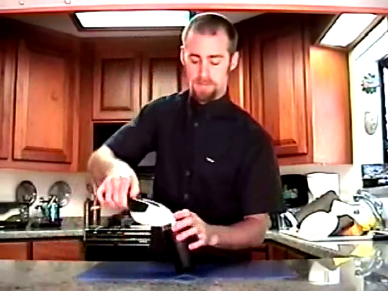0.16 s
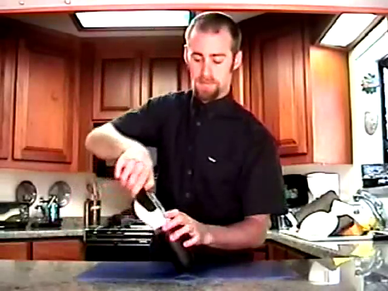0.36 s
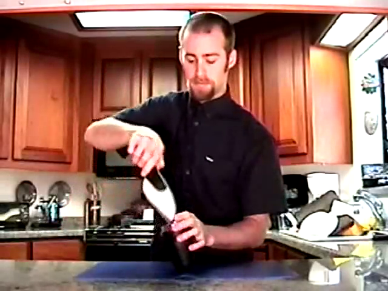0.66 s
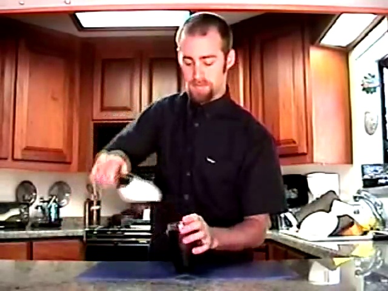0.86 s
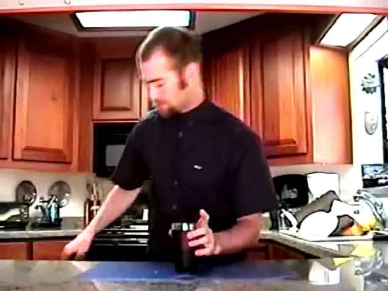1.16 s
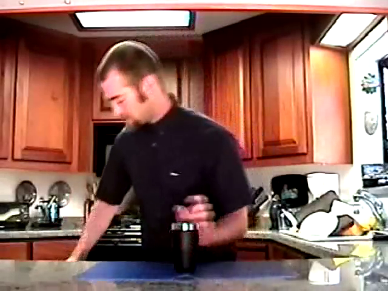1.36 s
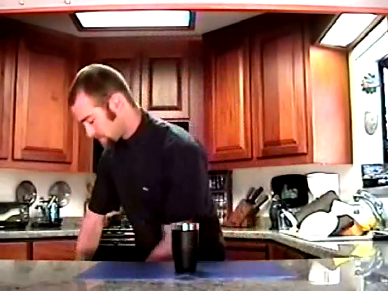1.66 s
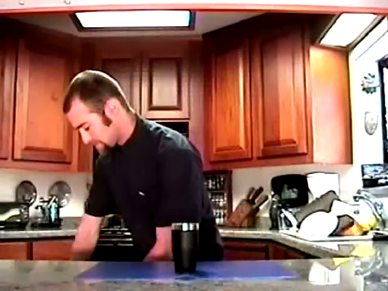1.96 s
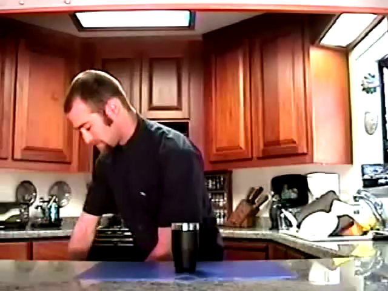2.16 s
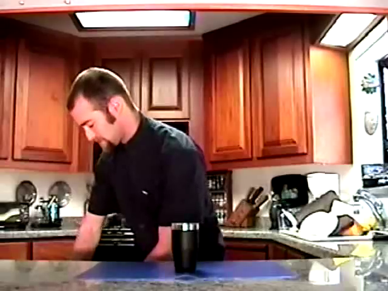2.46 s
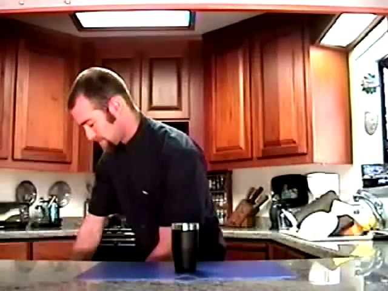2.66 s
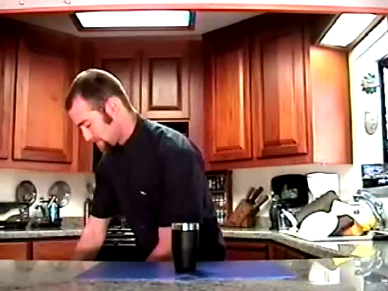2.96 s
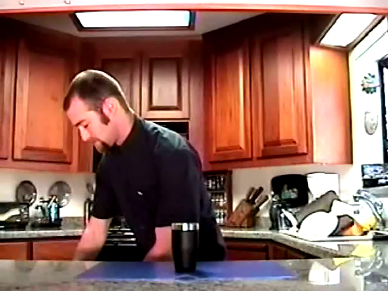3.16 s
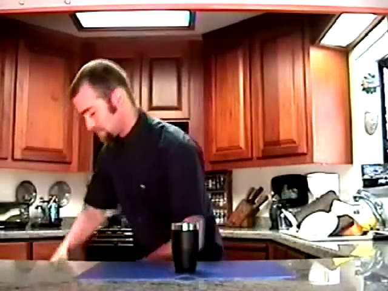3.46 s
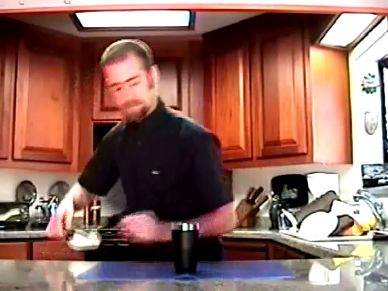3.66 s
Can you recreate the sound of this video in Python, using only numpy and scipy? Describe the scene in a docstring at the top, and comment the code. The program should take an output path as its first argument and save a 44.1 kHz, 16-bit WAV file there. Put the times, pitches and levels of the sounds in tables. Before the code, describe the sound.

Ice cubes clatter into a steel cocktail shaker with a brief metallic ring, after a metal scoop knocks on the rim. The scoop then crunches through a bin of ice and is shaken twice, in an echoing kitchen.

```python
"""A metal scoop knocks on a steel cocktail shaker, and ice cubes slide off and clatter in, ringing the steel.
Then the scoop digs through a bin of ice and is shaken twice, all in an echoing kitchen with a faint hum.
Each hit is a click that becomes a puff of noise and sets tones ringing. A fast volume control flattens
the loud moments. Levels in dB are relative. A ring time is how long a tone takes to fade by 60 dB;
a decay is how long a burst takes to fall to about a third."""
import sys
import numpy as np
from scipy import signal
from scipy.fft import rfft, irfft
from scipy.io import wavfile

SR = 44100
rng = np.random.default_rng(int(sys.argv[2]) if len(sys.argv) > 2 else 0)


def waveform_to_disk(signal):
    """Save audio, clipped to [-1, 1], as 16-bit WAV at the path in sys.argv[1]."""
    frames = np.transpose(np.atleast_2d(signal))
    scaled = np.clip(frames, -1, 1) * 32767
    samples = np.round(scaled).astype(np.int16)
    wavfile.write(sys.argv[1], SR, samples)


N = 167580
TIME = np.arange(N) / SR


def from_db(db):
    """Turn decibels into a number to multiply a sound by."""
    return 10 ** (np.asarray(db) / 20)


def in_time(rows):
    """Join rows that start with a time by straight lines: one curve for each further column."""
    times, *columns = np.transpose(rows)
    return [np.interp(TIME, times, column) for column in columns]


def during(rows):
    """On between the first row's time and the last row's, off elsewhere."""
    return (TIME > rows[0][0]) & (TIME < rows[-1][0])


def at_hz(points, hz):
    """Read between rows of frequency and value, giving every octave equal room."""
    frequencies, values = np.transpose(points)
    return np.interp(np.log(hz + 1e-3), np.log(frequencies), values)


def colour(sound, spectrum, size=4096):
    """Shape the bass and treble of a sound; white noise keeps its overall power."""
    gains = from_db(at_hz(spectrum, np.arange(size // 2 + 1) * SR / size))
    # Build a minimum-phase filter, so that nothing sounds ahead of a hit.
    cepstrum = irfft(np.log(gains))
    cepstrum[1:size // 2] *= 2
    cepstrum[size // 2 + 1:] = 0
    response = irfft(np.exp(rfft(cepstrum)))
    return signal.fftconvolve(sound, response / np.linalg.norm(response))[:N]


def hum():
    """The steady background: faint noise, strongest in the low notes."""
    # Each row: frequency in Hz, level in dB.
    spectrum = [(25, -21), (70, -22), (115, -22.5), (165, -6), (260, -7), (420, -9), (900, -14),
                (2200, -25), (14000, -34)]
    return from_db(-53) * colour(rng.standard_normal(N), spectrum)


def contacts(per_s, spread_db):
    """Pieces of ice touch at random moments: clicks of uneven size, with an average power of 1."""
    sizes = from_db(spread_db * np.minimum(rng.exponential(1, N), 4)) * rng.choice([-1, 1], N)
    clicks = sizes * (rng.random(N) < per_s / SR)
    return clicks / np.std(clicks)


def bursts(jolts):
    """Each jolt starts a shower of tiny clicks that dies away."""
    power = sum(from_db(db) ** 2 * (TIME >= start) * np.exp(-2 * np.abs(TIME - start) / decay_s)
                for start, db, decay_s in jolts)
    return np.sqrt(power) * contacts(per_s=4000, spread_db=1)


def blows(starts, db, scatter_db=2):
    """One click for each hit, by chance a little harder or softer."""
    sizes = from_db(db + scatter_db * rng.standard_normal(len(starts)))
    clicks = np.zeros(N)
    clicks[(np.asarray(starts) * SR).astype(int)] = sizes * rng.choice([-1, 1], len(starts))
    return clicks


def puffs(clicks, decay_s):
    """Every click becomes a short puff of noise with the same energy."""
    fade = np.exp(-2 / (decay_s * SR))
    power = signal.lfilter([1 - fade], [1, -fade], clicks ** 2 + 1e-18)
    return np.sqrt(power) * rng.standard_normal(N)


def ring(clicks, hz, db, ring_s, blur_hz=0, rise=0):
    """Clicks set a tone ringing. Rubbing ice blurs its pitch; a lighter load raises it by a fraction."""
    pole = np.exp((-np.log(1000) / ring_s + 2j * np.pi * hz) / SR)
    tone = signal.lfilter([1], [1, -pole], clicks + 1e-18)
    jitter = rng.standard_normal(N) * np.sqrt(2 * np.pi * blur_hz / SR)
    phase_drift = np.cumsum(jitter + 2 * np.pi * hz * rise / SR)
    return from_db(db) * np.real(tone * np.exp(1j * phase_drift))


def kitchen(sound):
    """The room's echoes: a wash that builds up quickly and lasts longest in the middle pitches."""
    # Each row: frequency in Hz, ring time of the room in seconds.
    ring_times = [(150, 0.33), (700, 0.71), (3000, 0.64), (8000, 0.49), (14000, 0.28)]
    centres, seconds = np.transpose(ring_times)
    t, hz = TIME[:SR], np.arange(SR // 2 + 1)
    noise_spectrum = rfft(rng.standard_normal(SR))
    tail = np.zeros(SR)
    for weights, ring_s in zip(np.eye(len(centres)), seconds):
        band = irfft(noise_spectrum * at_hz(list(zip(centres, weights)), hz), SR)
        tail += band * np.exp(-np.log(1000) * t / ring_s)
    build_up_s = 0.0009
    tail *= 1 - np.exp(-t / build_up_s)
    return signal.fftconvolve(sound, tail / np.linalg.norm(tail))[:N]


def scoop():
    """The full scoop knocks on the rim and rings, while chips tick and cubes slide along it."""
    # Three kinds of jolt. Each row: start in seconds, level in dB, decay in seconds.
    chips = [(0.1196, -42.5, 0.0045), (0.304, -23.5, 0.0025), (0.437, -34, 0.0081), (3.062, -33, 0.0055)]
    slides = [(0.1661, -38.5, 0.0036), (0.4659, -32, 0.0062), (0.5178, -28, 0.011), (0.5514, -30.5, 0.015)]
    knocks = [(0.2368, -20, 0.012), (0.257, -23.5, 0.019), (0.2857, -21.5, 0.01), (0.304, -27.5, 0.011)]
    # The noise of the full scoop, and of the chips. Each row: frequency in Hz, level in dB.
    scoop_spectrum = [(30, -7), (120, -13.5), (320, -4.5), (600, 1), (1000, -8), (1650, 0.5), (2400, 0),
                      (4000, -5), (6000, -13.5), (10000, -15.5), (14000, -29)]
    chip_spectrum = [(500, -8), (3000, 8), (9000, 1), (14000, -4)]
    # The scoop's own tones. Each row: pitch in Hz, level in dB, ring time in seconds.
    tones = [(703, -14.5, 0.14), (755, -19.5, 0.11), (1314, -27, 0.068), (1637, -18.5, 0.08),
             (1715, -19, 0.12)]
    starts, knock_db, _ = np.transpose(knocks)
    sound = colour(bursts(knocks + slides), scoop_spectrum) + colour(bursts(chips), chip_spectrum)
    sound += from_db(10.5) * sum(ring(blows(starts, knock_db), *tone) for tone in tones)
    return from_db(-3.5) * (sound + kitchen(sound))


def shaker():
    """Cubes drop in and tumble. The first ring the bare steel; the growing heap dulls and roughens it."""
    # Cubes strike the wall. Each row: start in seconds, strength in dB, extra wall ring in dB,
    # that ring's lean towards the treble in dB per octave, extra clink in dB.
    drops = [(0.5768, -20, -6, 0, 18), (0.5962, -19, 20, 3, -20), (0.634, -10, 12.5, 0.5, -19),
             (0.6539, 4.5, -3, 2.5, -9), (0.672, 2.5, 5, 0.5, -8), (0.694, -3, 8, -5, 2),
             (0.722, -4.5, 4, -3, 3), (0.756, -3, -5, -11.5, 0), (0.7923, -6.5, -1, 6.5, -3),
             (0.908, -8, -20, -8, -10)]
    # Cubes tumble over each other. Each row: time in seconds, level in dB.
    tumble_curve = [(0.58, -10), (0.66, -6), (0.74, 2.5), (0.84, -5.5), (0.91, -18), (0.97, -24.5),
                    (1.08, -43)]
    # The noise of a cube's hit. Each row: frequency in Hz, level in dB.
    crack_spectrum = [(30, -1), (100, -8), (450, -1), (650, 4), (1000, -1.5), (3000, 7), (7000, -1),
                      (14000, -8)]
    # Steel wall, bright clink and hollow cup. Each row: pitch in Hz, level in dB, ring time in seconds.
    wall_tones = [(2613, -19.5, 0.07), (2665, -19, 0.15), (4740, -30, 0.026), (4790, -21.5, 0.13),
                  (7590, -30.5, 0.051), (8180, -23.5, 0.052), (8290, -21.5, 0.19), (11200, -28.5, 0.031),
                  (12200, -31, 0.049)]
    clink_tones = [(1796, -40, 0.075), (4300, -22, 0.049), (4550, -29, 0.028), (5950, -26.5, 0.051),
                   (6250, -31, 0.04), (9460, -26.5, 0.02), (10730, -32, 0.038)]
    hollow_tones = [(656, -42.5, .1), (778, -48.5, 0.36)]
    # Cubes hit the bottom and thud through to the counter. Each row: start in seconds, level in dB.
    bottom_hits = [(0.576, 2), (0.637, 5), (0.755, 7)]
    starts, drop_db, wall_db, tilt_db, clink_db = np.transpose(drops)
    tumble_db, = in_time(tumble_curve)
    tumble = contacts(per_s=400, spread_db=1.5) * from_db(tumble_db - 25) * during(tumble_curve)

    def strikes(drop_extra_db, tumble_extra_db):
        """The clicks that reach one tone, each with a random strength."""
        small_hits = tumble * from_db(tumble_extra_db) * rng.standard_normal(N)
        return small_hits + blows(starts, drop_db + drop_extra_db)

    hits = tumble + blows(starts, drop_db - 1.5)
    sound = from_db(1) * colour(puffs(hits, decay_s=0.0038), crack_spectrum)
    fill_s, pivot_hz, damping_db_per_s = 0.24, 4700, 200  # this damping holds at pivot_hz, when full
    fill = np.clip((TIME - starts[0]) / fill_s, 0, 1)
    for hz, db, ring_s in wall_tones:
        octaves = np.log2(hz / pivot_hz)
        clicks = strikes(wall_db + tilt_db * octaves, tumble_extra_db=-15 + 6.5 * octaves)
        load = fill * hz / pivot_hz  # the heap damps high tones most
        damping = from_db(-np.cumsum(load) / SR * damping_db_per_s)
        # Dividing first lets each hit start at full strength and only then fade faster.
        sound += damping * ring(clicks / damping, hz, db, ring_s, blur_hz=45.4 * load)
    sound += sum(ring(strikes(clink_db, tumble_extra_db=0.5), *tone, blur_hz=124) for tone in clink_tones)
    sound += sum(ring(hits, *tone) for tone in hollow_tones)
    thud_hz = 280
    thuds = signal.sosfilt(signal.butter(2, thud_hz, fs=SR, output="sos"), blows(*np.transpose(bottom_hits)))
    return sound + thuds + from_db(-7.5) * kitchen(sound)


def ice_bin():
    """The scoop digs into the bin and is shaken; cubes grind on it and on each other."""
    # The push through the ice. Each row: time in seconds, level in dB, extra treble in dB.
    dig_curve = [(1.63, -49.5, 9.5), (1.735, -39.5, -1), (1.78, -29.5, 1.5), (1.89, -21.5, -0.5),
                 (1.98, -27, -0.5), (2.05, -29, 4.5), (2.17, -30, 0), (2.29, -23.5, -2), (2.385, -37.5, 0),
                 (2.425, -18, 0.5), (2.63, -33.5, 1), (2.665, -19.5, -3.5), (2.77, -36, 4.5),
                 (2.87, -34.5, -2), (2.97, -42, 3), (3.08, -40, -1.5), (3.18, -38, -26), (3.30, -42, -9)]
    # The scoop stabs in or is shaken. Each row: start in seconds, level in dB, decay in seconds.
    jolts = [(1.6215, -31.5, 0.029), (3.09, -33.5, .02), (3.115, -27.5, 0.034), (3.16, -29.5, 0.035),
             (3.3235, -25, 0.065), (3.341, -21.5, 0.033), (3.42, -39.5, 0.083)]
    # The scoop bumps in the bin with a hollow thunk. Each row: start in seconds, level in dB.
    thunks = [(1.623, -12), (1.645, -15), (1.677, -15), (1.715, -10), (2.398, -5), (2.598, -1), (2.745, -9),
              (3.117, -6.5), (3.325, -7), (3.385, -2), (3.48, -8)]
    # The noise of crunching ice. Each row: frequency in Hz, level in dB.
    crunch_spectrum = [(30, -18), (100, -37), (160, -8), (260, -8), (550, -2.5), (700, -1.5), (850, -3.5),
                       (1300, -2), (2400, -4), (4800, -7.5), (6800, -12), (9500, -10.5), (14000, -22)]
    # The tones of scoop and bin. Each row: pitch in Hz, level in dB, ring time in seconds.
    tones = [(485, -33.5, 0.28), (593.9, -27, 0.49), (623, -28.5, 0.052), (645, -28, 0.13),
             (676, -30.5, 0.21)]
    treble_hz, lift_s, sweeps_per_s = 3270, 3.6, 1.3
    level_db, treble_db = in_time(dig_curve)
    effort = from_db(level_db) * during(dig_curve)
    grind = puffs(contacts(per_s=1300, spread_db=3.5), decay_s=0.00065) * effort
    treble = signal.sosfilt(signal.butter(1, treble_hz, "high", fs=SR, output="sos"), grind)
    crunch = colour(grind + (from_db(treble_db) - 1) * treble + bursts(jolts), crunch_spectrum)
    hits = from_db(-17.5) * crunch + blows(*np.transpose(thunks))
    rise = 0.093 * (TIME > lift_s)  # lifted clear of the ice, the scoop rings higher
    ringing = sum(ring(hits, *tone, blur_hz=5.2, rise=rise) for tone in tones)
    ice = crunch + from_db(-7) * effort * clacks() + jammed_cubes()
    # The echoes change as the scoop moves: blend back and forth between two sets of them.
    sweep = 2 * np.pi * sweeps_per_s * TIME
    echoes = kitchen(ice * np.cos(sweep)) + kitchen(ice * np.sin(sweep))
    return ringing + from_db(-4.5) * ice + from_db(-3) * echoes


def clacks(per_s=150, low_hz=1017, high_hz=3890, pitches=24, ring_cycles=14):
    """Whole cubes clack together, each ringing briefly at its own pitch; the average power is 1."""
    rings = sum(ring(contacts(per_s / pitches, spread_db=-1.5), hz, db=0, ring_s=ring_cycles / hz)
                for hz in np.geomspace(low_hz, high_hz, pitches))
    return rings / np.std(rings)


def jammed_cubes(decay_s=0.015, sharpness=2.9):
    """A jammed cube gives way with a crunch: a short shower of clicks around one rough pitch."""
    # Each row: start in seconds, level in dB, pitch in Hz.
    crunches = [(2.041, -17.5, 1150), (2.421, -14.5, 1220), (2.654, -18.5, 1290), (3.159, -29, 2000),
                (3.353, -19.5, 1380)]
    sound = np.zeros(N)
    for start, db, hz in crunches:
        crunch = signal.lfilter(*signal.iirpeak(hz, sharpness, fs=SR), bursts([(start, db, decay_s)]))
        sound += crunch * np.sqrt(SR * sharpness / (np.pi * hz))  # restore the power the filter takes
    return sound


def scene():
    """All the sounds at one microphone, the same on the left and right."""
    mono = scoop() + shaker() + ice_bin() + hum()
    return np.array([mono, mono])


def record(dry):
    """A fast volume control holds loud moments down; peaks are rounded and the highest treble is cut."""
    detect_s, limit_db, cut_share, release_db_per_s = 0.00096, -22.5, 0.7, 83
    ceiling, cutoff_hz = 0.22, 14400
    fade = np.exp(-1 / (detect_s * SR))
    power = signal.lfilter([1 - fade], [1, -fade], dry[0] ** 2)
    over_db = np.maximum(10 * np.log10(power + 1e-12) - limit_db, 0)
    # The volume drops at once and comes back at a steady pace.
    release_db = release_db_per_s * TIME
    held_db = np.maximum.accumulate(over_db + release_db) - release_db
    limited = dry * from_db(-cut_share * held_db)
    rounded = ceiling * np.tanh(limited / ceiling)
    return signal.sosfilt(signal.ellip(12, .2, 80, cutoff_hz, fs=SR, output="sos"), rounded)


dry = scene()
out = record(dry)
waveform_to_disk(out)
```